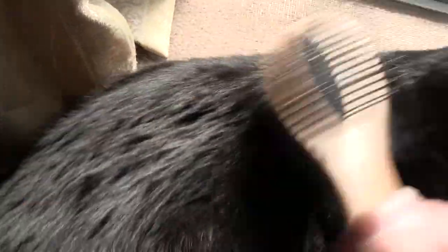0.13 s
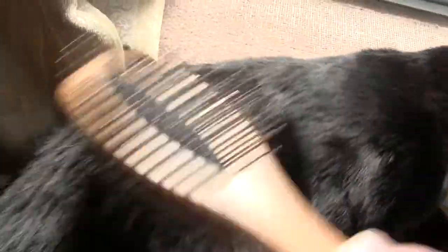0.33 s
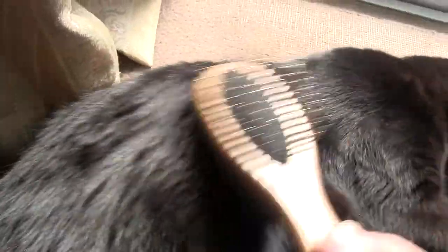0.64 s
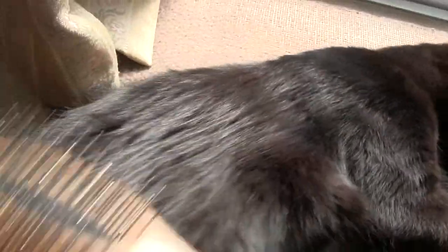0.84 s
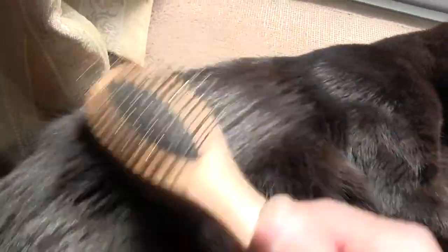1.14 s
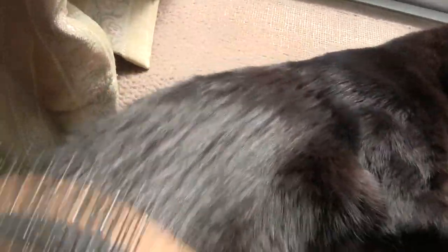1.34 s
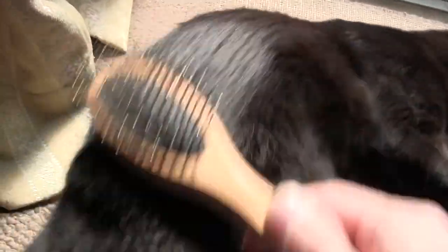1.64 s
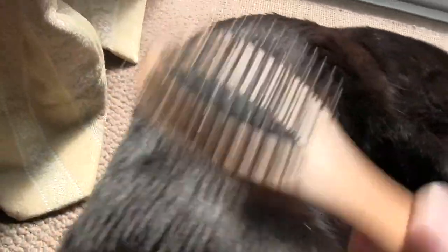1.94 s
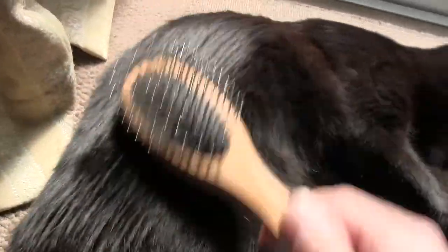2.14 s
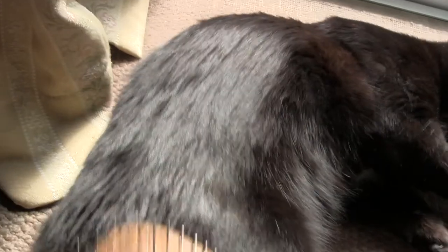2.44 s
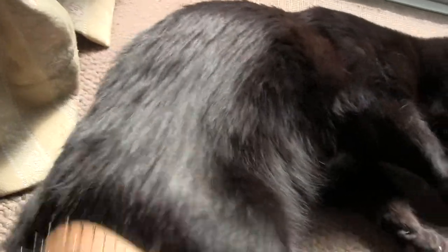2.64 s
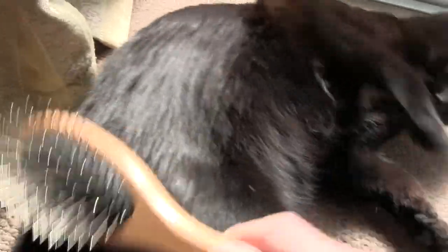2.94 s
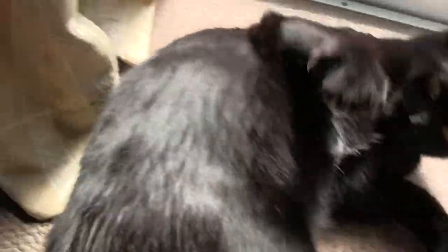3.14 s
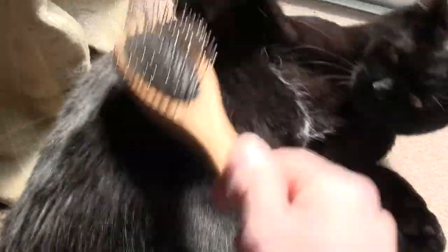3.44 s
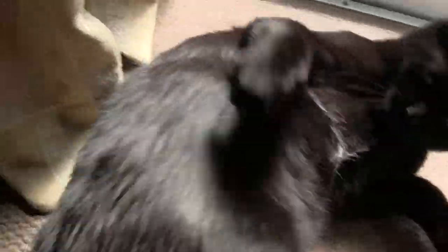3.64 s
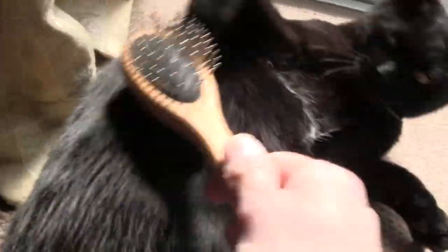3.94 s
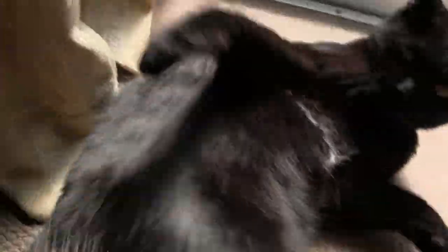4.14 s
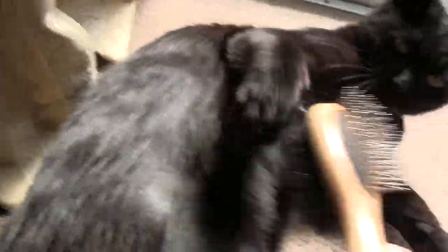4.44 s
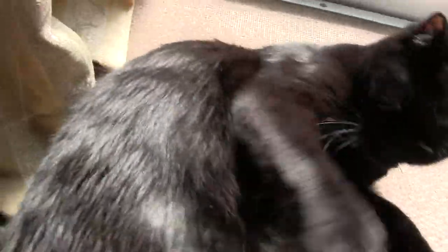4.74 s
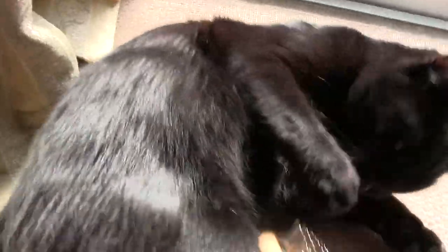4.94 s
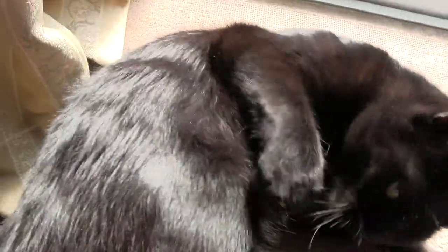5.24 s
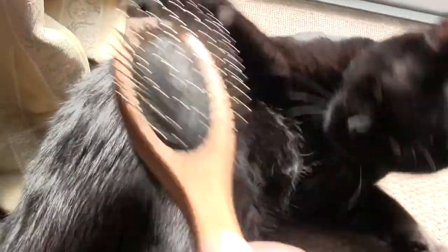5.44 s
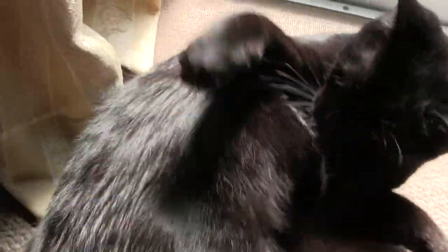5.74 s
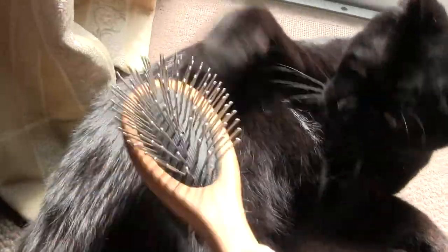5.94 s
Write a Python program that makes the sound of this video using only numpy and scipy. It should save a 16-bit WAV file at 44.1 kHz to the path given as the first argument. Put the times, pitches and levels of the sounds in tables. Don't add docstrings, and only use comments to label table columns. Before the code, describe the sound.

A pin brush rasps repeatedly through a cat's fur over a steady hush, with two bursts of loud snaps and scattered static ticks.

```python
import sys
import numpy as np
from scipy import signal
from scipy.fft import rfft, irfft
from scipy.io import wavfile
from scipy.ndimage import uniform_filter1d

SR = 44100
rng = np.random.default_rng(int(sys.argv[2]) if len(sys.argv) > 2 else 0)


def linear_from_db(decibels):
    return 10 ** (np.asarray(decibels, float) / 20)


def master_out(mix):
    frames = np.transpose(np.atleast_2d(mix))
    ceiling = np.clip(frames, -1, 1)
    pcm = np.round(ceiling * 32767).astype(np.int16)
    wavfile.write(sys.argv[1], SR, pcm)


N = 268721

# pitch_hz, density_db (per Hz)
HUSH_SPECTRUM = [(15, -48), (27, -12), (70, -12.5), (107, -2.5), (770, -2), (1060, -4.5), (3200, -7),
                 (15800, -26)]
# pitch_hz, side_minus_mid_db
HUSH_WIDTH = [(30, -55), (125, -7.5), (500, -0.5), (2000, -6.5), (6000, -7), (12000, -0.5)]

# start_s, level_db, pitch_hz, t60_s
BUMPS = [(.162, -32, 610, .035), (.857, -37.5, 480, .03), (5.5355, -36, 1480, .04), (1.329, -39, 700, .03),
         (4.63, -38, 520, .04), (.2745, -27, 480, 0.025), (0.275, -24.5, 200, 0.06),
         (0.277, -27, 122, 0.086), (.165, -38, 200, 0.13), (.815, -37, 214, 0.071),
         (6.03, -34.5, 159, 0.038), (0.399, -43.5, 269, 0.084), (0.8134, -30, 520, 0.027),
         (0.856, -37, 230, 0.065), (1.0798, -30, 184, 0.059), (4.257, -35.5, 150, 0.12),
         (4.658, -34, 433, 0.093), (4.686, -29, 463, 0.051), (4.797, -36.5, 700, 0.018),
         (4.863, -37.5, 427, 0.04), (4.925, -32.5, 516, 0.036), (4.957, -31, 503, 0.043),
         (5.074, -34, 486, 0.029), (5.245, -39, 484, 0.025), (5.962, -39.5, 527, 0.058),
         (6.019, -31.5, 346, 0.023)]
# level_db, pulse_hz
SLAP = (-16, 900)
SLAP_S = .2732
RUSTLE_TIMES = [3.27, 5.541, 5.525, 1.14, .71, 4.29, 4.956, 5.497, 5.98]
# length_s, pitch_hz, level_db
RUSTLES = [(0.21, 690, -55), (0.015, 1420, -39), (0.06, 920, -49.5), (0.054, 454, -49.5), (0.054, 446, -52),
           (0.024, 287, -55), (0.011, 520, -51), (0.024, 6700, -50), (0.055, 1000, -54)]
# centre_s, length_s, start_hz, end_hz, level_db
SQUEAK = (5.94, .035, 3900, 4250, -56)

SNAP_TIMES = [1.3291, 1.37215, 2.658, 2.6862, 2.6886, 2.6907, 2.6943, 2.6948, 2.7036, 2.7066, 2.7069,
              2.7084, 2.7124, 2.7133]
# level_db, pulse_hz, edge_db (sharp edge re pulse)
SNAPS = [(-28.5, 2100, -20), (-2, 2040, -19), (-37, 2400, -20), (-18.5, 2470, -7), (-19, 1900, -9),
         (-41, 3000, -18), (-12.5, 3600, -10), (-13, 2700, -23), (-16, 2900, -12), (-13, 2540, -18),
         (-13, 2600, -1.5), (-0.5, 1820, -28), (-24, 3000, -19), (-14.5, 3400, -4.5)]
# pitch_hz, level_db, t60_s
SNAP_MODES = [(708, -27.5, 0.067), (760, -14, 0.039), (4120, -19, 0.0045), (1166, -11.5, 0.022),
              (1840, -26.5, 0.025), (200, -61, .06), (427, -29, 0.077)]
ECHO_DELAYS = [.00095, .0015, .0024, .0043, .0063, .0101]
# level_db, top_hz
ECHOES = [(-8, 1100), (-20, 5300), (-22, 1200), (-44, 1500), (-24, 970), (-20, 1800)]
# pitch_hz, level_db, t60_s
ROOM_TAIL = [(132, -45.5, 1), (209, -43.5, 1), (367, -35, 0.69), (480, -36, 0.52), (700, -34, 0.57),
             (1130, -33, 0.54), (1570, -44, 0.3), (2010, -37, 0.48), (3100, -38, 0.2), (4800, -67, .2),
             (4030, -19.5, 0.018)]

# start_s, level_db, pitch_hz, ring_cycles
SPARKS = [(1.8748, -33, 9500, 3), (2.435, -29, 9800, 4), (2.4728, -33, 9000, 3), (2.8364, -35, 8500, 2.5),
          (3.68, -30.5, 9500, 3), (3.6844, -37, 5600, 4.4), (3.5434, -34, 10000, 4), (3.9913, -38, 6800, 3),
          (4.2451, -32, 9000, 3), (4.2683, -31.5, 9900, 4.3), (4.5412, -36, 9000, 3),
          (4.616, -27, 9000, 2.5), (4.6471, -20, 6800, 7.9), (4.6507, -26, 7300, 7),
          (4.6565, -11.5, 7400, 5.1), (4.6747, -23, 9500, 3.7), (4.6833, -10.5, 6800, 6.4),
          (4.6875, -18, 5900, 8), (4.2742, -37, 9000, 2.5), (5.0276, -28, 6600, 4.5),
          (5.139, -28, 6400, 12), (5.4804, -34, 7300, 5), (5.486, -23.5, 7550, 31), (5.505, -27, 5170, 21),
          (5.5083, -26.5, 7140, 24), (5.7766, -27.5, 9980, 3), (5.79, -28, 9000, 3),
          (5.852, -34.5, 5690, 6.8), (5.874, -43, 9500, 4), (5.9166, -37, 8500, 3)]
# start_s, level_db, pin_db (re tick), knock_db (paddle re tick)
FLICKS = [(.162, -36, 4.5, -2), (.2094, -39, -10, -9), (0.2725, -16, -8, 5), (0.2767, -32, 3, -2),
          (0.5752, -48, 9, 14), (0.8134, -27.5, 8, -8), (.857, -41, 3, 16.5), (0.9486, -46, -6, 21),
          (0.9656, -46, 4, 14), (1.1168, -37, -9, 17), (2.176, -46, 4, 10), (2.5874, -46.5, 2, 18.5),
          (2.9097, -39, 3.5, -12), (3.4349, -18.5, -13, -20), (3.4372, -32, 2, -1), (4.6572, -34, 4, -4),
          (4.6678, -34, -8, 10), (4.6847, -30, -4, 10), (4.7744, -39, 2, 6), (4.797, -39, 6.5, 12),
          (4.8645, -41.5, 2, 8), (4.9246, -30, 5, 10.5), (4.934, -33, -13, -12), (4.9625, -32.5, -9, 8),
          (5.0927, -35, -14, 15), (5.1124, -30, 2.5, -5), (5.245, -35.5, 4, 11.5), (5.4859, -26, -12, -20),
          (6.0178, -37.5, 2.5, 16)]

# touch_s, hardest_s, lift_s, rustle_db, hiss_db (bright hair hiss re rustle)
STROKES = [(0.132, 0.173, 0.21, -45.5, -16), (0.184, 0.266, 0.31, -37, -15), (0.614, 0.76, .85, -37, -21),
           (1.004, 1.052, 1.112, -47, -33), (1.072, 1.246, 1.344, -39, -10), (1.3, 1.48, 1.636, -51, -28),
           (1.536, 1.792, 1.855, -40, -10.5), (2.13, 2.322, 2.418, -41.5, -6),
           (2.638, 2.695, 2.706, -40, -5.5), (3.011, 3.088, 3.14, -43.5, -4),
           (3.432, 3.434, 3.475, -48, -5), (3.505, 3.605, 3.674, -39, -7.5), (4.01, 4.114, 4.198, -41, -8),
           (4.554, 4.634, 4.715, -39.5, -9), (4.694, 4.715, 4.79, -50.5, -3), (4.91, 4.93, 4.99, -45.5, -7),
           (4.965, 5.004, 5.04, -47, -4), (5.012, 5.044, 5.12, -41, -5), (5.043, 5.139, 5.16, -39.5, -7),
           (5.47, 5.497, 5.53, -46, -11), (5.524, 5.541, 5.56, -44.5, -28), (5.623, 5.69, 5.79, -44.5, -6),
           (5.786, 5.8, 5.822, -59, 4), (5.953, 5.966, 6.13, -51, -27)]
# pitch_hz, width_hz, level_db
PIN_MODES = [(1250, 220, -17), (2100, 710, 9.5), (3010, 1500, 7.5), (4070, 850, 0.5), (5200, 1840, -0.5)]
# centre_s, length_s, rub_db
LEANS = [(0.171, 0.035, -50), (0.276, 0.024, -37), (.82, .03, -53), (0.86, .025, -55), (1.33, 0.014, -48),
         (1.524, .1, -48.5), (4.267, .06, -48), (4.657, 0.061, -43), (4.92, 0.043, -52), (5.08, 0.11, -50),
         (5.535, 0.036, -55), (5.995, 0.084, -48.5)]

SIDES = np.array([[1], [-1]])
LEAD = 20


def band(x, hz, width, order=1):
    edge = np.sqrt(hz ** 2 + width ** 2 / 4)
    edges = [max(edge - width / 2, 10), min(edge + width / 2, .45 * SR)]
    return signal.sosfilt(signal.butter(order, edges, "band", fs=SR, output="sos"), x)


def low_pass(x, order, hz):
    return signal.lfilter(*signal.butter(order, hz, fs=SR), x)


def unit(x):
    return x / np.sqrt(np.mean(x ** 2))


def read(table, hz):
    f, v = np.transpose(table)
    return np.interp(np.log(np.maximum(hz, 1)), np.log(f), v)


def coloured(db):
    return irfft(rfft(rng.standard_normal(N)) * linear_from_db(db), N)


def walk(rate):
    k = int(SR / rate)
    steps = np.repeat(rng.standard_normal(N // k + 1), k)
    return unit(uniform_filter1d(uniform_filter1d(steps, k), k)[:N])


def ring(hz, t60, length=.15):
    t = np.arange(int(length * SR)) / SR
    return np.sin(2 * np.pi * hz * t) * np.exp(-np.log(1000) * t / t60)


def bell(t, centre, length, power=2):
    return np.exp(-(2 * (t - centre) / length) ** power)


def add(out, s, x):
    i = int(s * SR)
    out[..., i:i + x.shape[-1]] += x[..., :N - i]


def panned(x, pan_db):
    return x * linear_from_db(SIDES * pan_db / 2)


def pulse(s, hz):
    t = (np.arange(int(.003 * SR)) - LEAD - s * SR % 1) / SR * hz
    return np.sin(2 * np.pi * t) * np.exp(-((t - .5) / 0.63) ** 4)


def slips(scatter_db, patchy_db):
    size_db = scatter_db * rng.exponential(size=N)
    return rng.standard_normal(N) * linear_from_db(size_db + patchy_db * walk(300))


def hush():
    hz = np.fft.rfftfreq(N, 1 / SR)
    mid = coloured(read(HUSH_SPECTRUM, hz))
    side = coloured(read(HUSH_SPECTRUM, hz) + read(HUSH_WIDTH, hz))
    level = linear_from_db(-49.5 + 0.077 * walk(4.02))
    return level * (mid + side * SIDES) / np.std(mid)


def bumps():
    out, t = np.zeros(N), np.arange(N) / SR
    grits = rng.standard_normal((len(BUMPS), int(.15 * SR)))
    for (s, db, hz, t60), grit in zip(BUMPS, grits):
        fade = linear_from_db(-60 * t[:len(grit)] / (1.5 * t60))
        give = unit(band(grit, 1.13 * hz, 0.99 * hz, order=2)) * fade
        modes = ring(hz, t60) + 0.16 * ring(1.145 * hz, 2.6 * t60)
        add(out, s, linear_from_db(db - 12.5) * give)
        add(out, s, linear_from_db(db - 1.0) * modes)

    slap_db, slap_hz = SLAP
    add(out, SLAP_S - LEAD / SR, linear_from_db(slap_db) * pulse(SLAP_S, slap_hz))

    noise = rng.standard_normal(N)
    for s, (length, hz, db) in zip(RUSTLE_TIMES, RUSTLES):
        out += linear_from_db(db) * unit(band(noise, hz, 0.2 * hz, order=2)) * bell(t, s, length)

    s, length, start_hz, end_hz, db = SQUEAK
    glide = np.interp(t, [s - length / 2, s + length / 2], [start_hz, end_hz])
    out += linear_from_db(db) * np.sin(2 * np.pi * np.cumsum(glide) / SR) * bell(t, s, length, power=4)
    return panned(out, pan_db=1.2)


def room_tail():
    t = np.arange(SR) / SR
    noise = rng.standard_normal((len(ROOM_TAIL), 2, SR))
    tail = np.zeros((2, SR))
    for (hz, db, t60), air in zip(ROOM_TAIL, noise):
        tail += linear_from_db(db - 60 * t / t60) * unit(band(air, hz, 0.41 * hz, order=2))
    return tail * np.minimum(t / 0.0006, 1)


def snaps():
    pulses, kicks = np.zeros(N), np.zeros(N)
    for s, (db, hz, edge_db) in zip(SNAP_TIMES, SNAPS):
        add(pulses, s - LEAD / SR, linear_from_db(db) * pulse(s, hz))
        add(pulses, s, linear_from_db(db + edge_db + 7.0) * ring(6800, 0.0014, .003))
        add(kicks, s, linear_from_db(np.array([db])))

    body = sum(linear_from_db(db) * ring(hz, t60) for hz, db, t60 in SNAP_MODES)
    near = pulses + signal.fftconvolve(kicks, body)[:N]
    for delay, (db, top_hz) in zip(ECHO_DELAYS, ECHOES):
        add(near, delay, linear_from_db(db) * low_pass(pulses, 1, top_hz))

    shield_db = np.where(np.arange(N) < 2.6 * SR, -3.5, 0)
    mid, side = (signal.fftconvolve(kicks * linear_from_db(shield_db), line)[:N] for line in room_tail())
    return panned(near + mid, pan_db=-2.5) + linear_from_db(-17) * side * SIDES


def sparks():
    out, t = np.zeros(N), np.arange(int(.02 * SR)) / SR
    # start_s, level_db, pitch_hz, pin_db, knock_db, ring_cycles, top_hz
    ticks = [(s, db, hz, -25, -30, cycles, 17000) for s, db, hz, cycles in SPARKS]
    ticks += [(s, db, 5000, pin_db, knock_db, 6, 6500) for s, db, pin_db, knock_db in FLICKS]
    fizz_decay_s = np.array([[.0009], [.0012], [.002]])
    fizz = rng.standard_normal((len(ticks), 3, len(t))) * np.exp(-t / fizz_decay_s)
    for (s, db, hz, pin_db, knock_db, cycles, top_hz), noise in zip(ticks, fizz):
        cycles = np.clip(cycles, 1.5, 30)
        tick = ring(hz, cycles / hz, .02) + .65 * band(noise[0], hz, min(4 / cycles, 1.2) * hz)
        pin = 1.3 * band(ring(3400, .0012, .02) + .35 * noise[1], 3500, 3600)
        knock = 1.3 * band(ring(1500, .003, .02) + .8 * noise[2], 1500, 1800)
        whole = tick + linear_from_db(pin_db + 6) * pin + linear_from_db(knock_db - 8.5) * knock
        add(out, s + .0005, linear_from_db(db + 3) * low_pass(whole, 2, top_hz))
    return panned(out, pan_db=-2.0) + linear_from_db(-10.5) * band(out, 9400, 9000) * SIDES


def stroke_pressure():
    press_curve, lift_curve = 1.13, 0.79
    brighten_db, rub_db = 11, -13.5
    t, gains = np.arange(N) / SR, np.zeros((3, N))
    for touch, hardest, lift, db, hiss_db in STROKES:
        press = np.sin(np.pi / 2 * np.clip((t - touch) / (hardest - touch), 0, 1)) ** press_curve
        leave = np.sin(np.pi / 2 * np.clip((lift - t) / (lift - hardest), 0, 1)) ** lift_curve
        along = np.clip((t - touch) / (lift - touch), 0, 1) - .5
        balance_db = [0 * t, hiss_db + brighten_db * along, rub_db + 0 * t]
        gains += linear_from_db(db) * press * leave * linear_from_db(balance_db)
    gains *= linear_from_db(1.1 * walk(30))
    for s, length, db in LEANS:
        gains[2] += linear_from_db(db) * bell(t, s, length)
    return gains


def strokes():
    pin_gain, tip_gain, coat_gain = stroke_pressure()
    clicks = slips(scatter_db=2.1, patchy_db=1.4)
    pins = unit(sum(linear_from_db(db) * band(clicks, hz, width) for hz, width, db in PIN_MODES))
    tips = unit(band(clicks, 7950, 11200, order=2))
    rub = slips(scatter_db=2.5, patchy_db=2.5)
    coat = unit(band(rub, 643, 810, order=2))
    mid = pin_gain * pins + tip_gain * tips + coat_gain * coat

    other = slips(scatter_db=2.2, patchy_db=.8)
    side_pins = pin_gain * unit(band(other, 2400, 6300))
    side_tips = linear_from_db(1.5) * tip_gain * unit(band(other, 10400, 7400))
    return panned(mid, pan_db=0.0) + linear_from_db(-18) * (side_pins + side_tips) * SIDES


def scene():
    near = bumps() + snaps() + sparks() + strokes()
    near = signal.sosfilt(signal.butter(4, 128.5, "high", fs=SR, output="sos"), near)
    near = signal.sosfilt(signal.butter(4, 11450, fs=SR, output="sos"), near)
    return hush() + near


def band_limit(x):
    return signal.sosfilt(signal.butter(12, 16520, fs=SR, output="sos"), x)


def record(dry):
    clipped = np.clip(dry, -.93, .93)
    cut = signal.sosfilt(signal.ellip(8, .2, 70, 15900, fs=SR, output="sos"), clipped)
    return band_limit(cut - .0017)


dry = scene()
out = record(dry)
master_out(out)
```